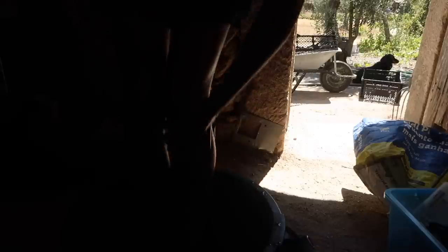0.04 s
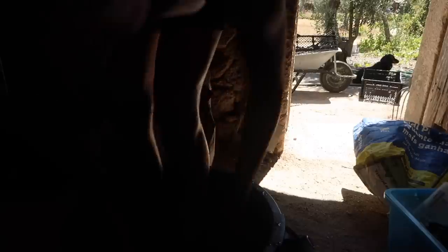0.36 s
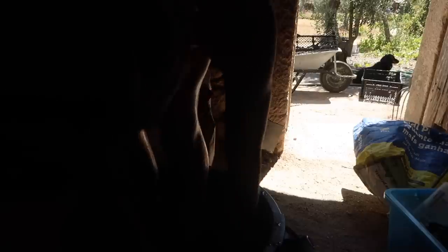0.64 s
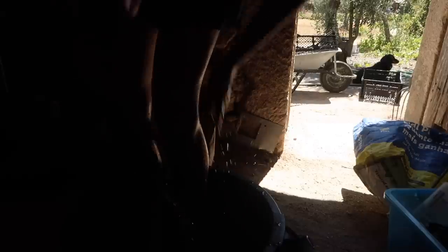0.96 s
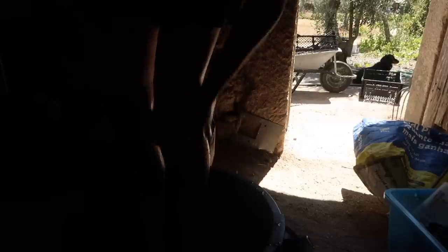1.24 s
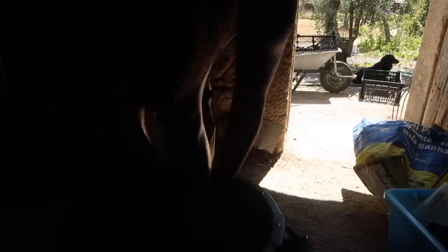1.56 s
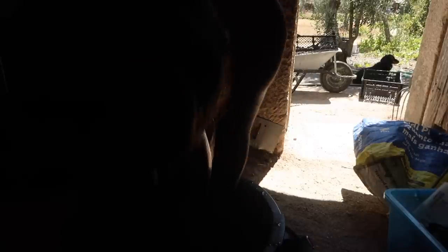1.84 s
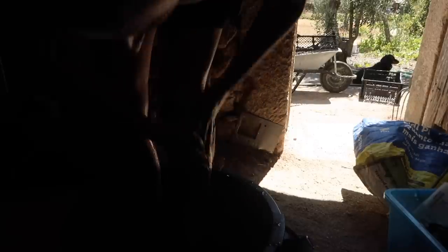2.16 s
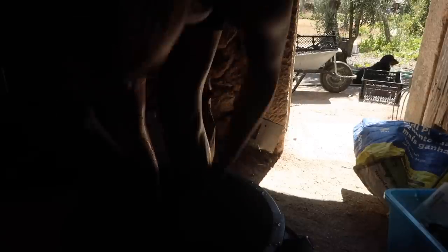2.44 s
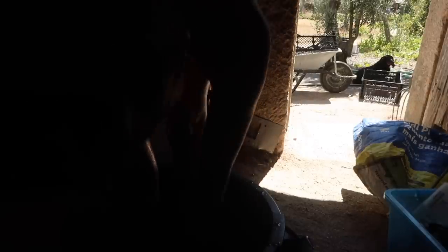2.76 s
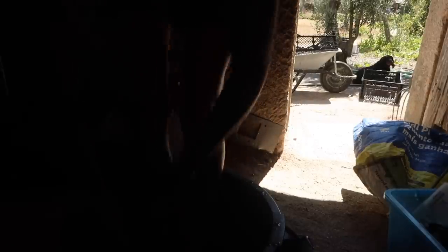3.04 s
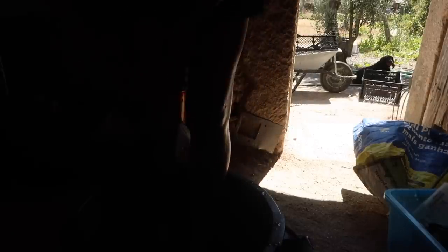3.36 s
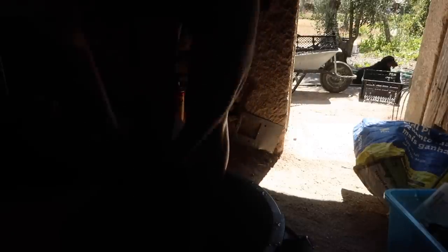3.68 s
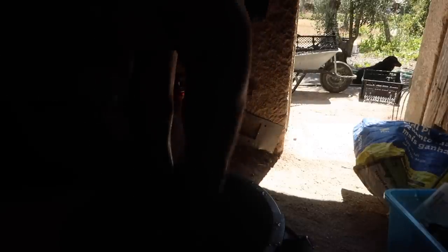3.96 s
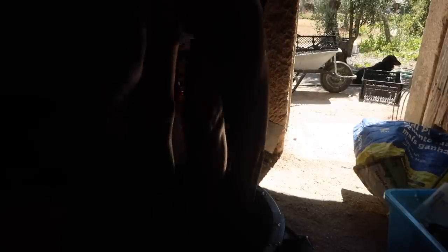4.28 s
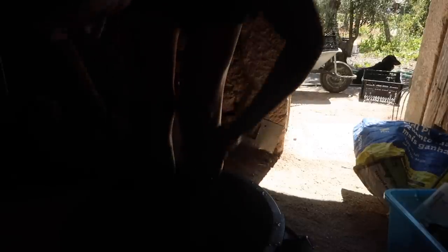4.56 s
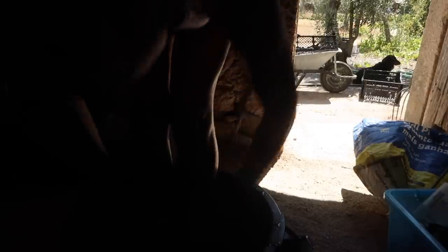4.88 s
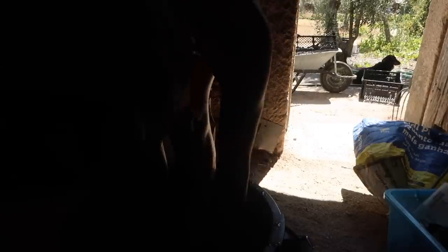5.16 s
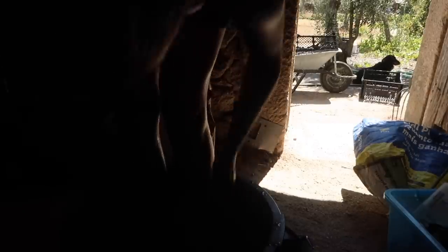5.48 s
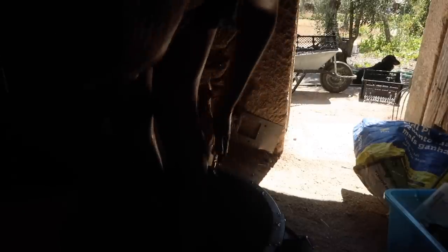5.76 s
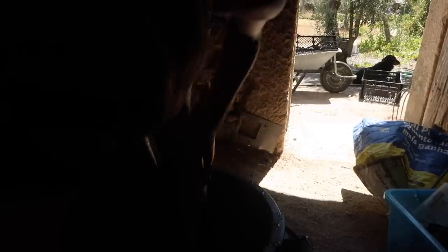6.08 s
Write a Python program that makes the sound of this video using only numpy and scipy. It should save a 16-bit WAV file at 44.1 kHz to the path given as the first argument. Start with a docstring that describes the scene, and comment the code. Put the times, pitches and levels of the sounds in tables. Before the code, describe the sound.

Bare feet tread crushed grapes in a plastic tub, heard close in a quiet barn. Small wet splats and pops open the sound. The first stroke squelches and gurgles from about 0.6 to 1.4 seconds, with popping bubbles and fine spray. A second follows from 1.7 to 2 seconds with light sole slaps, then a clear drip at 2.1. The third gulps and squelches from 2.6 to 3 seconds, followed by a lull with a few soft splats. The fourth, from 4 to 4.6 seconds, is the sharpest, with wet slaps and loud pops. Juice drips, and a heel thumps the tub dully near 5 seconds. The fifth stroke gurgles deeply from 5.1 to 5.5 seconds. Scattered drips, pops and splats continue until about 6.3 seconds. Everything carries a short hollow echo from the tub and a slight one from the barn, over faint still air.

```python
"""Inside a barn, bare feet tread crushed grapes in a plastic tub: five slow strokes.
Each stroke churns the must into clouds of bubbles and spray. Large air pockets ring and pop,
the hollow under the foot gulps, soles slap, wet skins splat and juice drips back.
Once a heel thumps the tub. The tub wall and the barn echo over faint still air."""
import sys
import numpy as np
from scipy import signal
from scipy.fft import rfft, irfft, next_fast_len
from scipy.io import wavfile
from scipy.ndimage import uniform_filter1d, map_coordinates

SR = 44100
rng = np.random.default_rng(int(sys.argv[2]) if len(sys.argv) > 2 else 0)


def write(x):
    x = np.atleast_2d(x).T
    wavfile.write(sys.argv[1], SR, np.round(np.clip(x, -1, 1) * 32767).astype(np.int16))

N = 278705


def amp(db):
    """Decibels to gain."""
    return 10 ** (np.asarray(db) / 20)


def unit(x):
    """Scale to rms 1."""
    return x / np.sqrt(np.mean(x ** 2) + 1e-20)


def along(points, hz):
    """Interpolate (freq_hz, value) points on a log axis."""
    freqs_hz, values = np.transpose(points)
    return np.interp(np.log(hz + 1), np.log(freqs_hz), values)


def filtered(x, response):
    """Apply a zero-phase gain, response(hz)."""
    size = next_fast_len(N + SR // 2)
    return irfft(rfft(x, size) * response(np.fft.rfftfreq(size, 1 / SR)), size)[..., :N]


def coloured(x, spectrum):
    """Shape by (freq_hz, gain_db) points; rms 1."""
    return unit(filtered(x, lambda hz: amp(along(spectrum, hz))))


def add(track, start_s, sound):
    """Mix a sound into a track."""
    start = int(np.clip(start_s * SR, 0, len(track) - 1))
    track[start:start + len(sound)] += sound[:len(track) - start]


def jitter(t, per_s):
    """Smooth random motion, rms about 1."""
    knots = t * per_s
    return map_coordinates(rng.standard_normal(int(knots[-1]) + 2), [knots])


PITCH_WOBBLE, LEVEL_WOBBLE = 0.032, 0.22
def wobble(t, depth):
    """Pulp pressure on a bubble wall: a factor wavering about 1."""
    return 1 + depth * jitter(t, per_s=260)


def bubble(t, hz, life_s, rise, swell):
    """A bubble rings up, dies, and climbs in pitch as it nears the surface."""
    age = t / life_s
    pitch_hz = hz * (1 + rise * np.minimum(age, 2) ** 2)
    envelope = (1 - np.exp(-age / swell)) ** 2 * np.exp(-age ** 1.3)
    return envelope * np.sin(2 * np.pi * np.cumsum(pitch_hz, axis=-1) / SR)


def froth(spectrum, band_hz, per_s, cycles, rush, spread_db):
    """Small damped bubbles of random size over rushing juice; rms 1."""
    low_hz, high_hz = band_hz
    when, size, strength, damping = rng.random((int(per_s * N / SR), 4)).T[..., None]
    hz = low_hz * (high_hz / low_hz) ** size
    life_s = cycles * (0.5 + damping) / hz
    samples = np.arange(int(2 * cycles / low_hz * SR))
    rings = bubble(np.float32(samples / SR), np.float32(hz), np.float32(life_s), rise=0, swell=0.24)
    rings = rings * np.sqrt(hz) * amp(spread_db * np.minimum(-np.log(1 - strength), 3))
    positions = (when * N).astype(int) + samples
    cloud = np.bincount(positions.ravel(), rings.ravel(), N)[:N]
    return unit(coloured(cloud, spectrum) + rush * coloured(rng.standard_normal(N), spectrum))


# Barn air: freq_hz, gain_db
AIR_SPECTRUM = [(18, -57.5), (30, -19.5), (139, -11.5), (346, -5), (524, -13.5), (629, -11.5), (1340, -19),
                (2920, -19.5), (3320, -20.5), (3680, -25.5), (5730, -29), (15000, -53)]
def still_air():
    """Faint steady noise, mid and side."""
    return amp([[-65.8], [-74.5]]) * coloured(rng.standard_normal((2, N)), AIR_SPECTRUM)


# Side relative to mid: freq_hz, gain_db
SIDE_SPECTRUM = [(125, -29), (400, -23), (1000, -25.5), (2500, -24), (3100, -19), (3900, -7.5),
                 (5500, -4.5), (7500, 1.5), (9500, 4), (14000, 2.5)]
def scattered(mid):
    """Sound from many directions: a phase-shuffled side signal, mostly treble."""
    bins = signal.stft(mid, nperseg=256)[2]
    shuffled = signal.istft(bins * np.exp(2j * np.pi * rng.random(bins.shape)), nperseg=256)[1][:N]
    return filtered(unit(shuffled) * np.std(mid), lambda hz: amp(along(SIDE_SPECTRUM, hz)))


# Decay of the barn: freq_hz, t60_s
BARN_DECAY = [(100, 0.25), (500, 0.14), (2000, 0.36), (5000, 0.056), (12000, 0.1)]
# Decay of the air in the tub: freq_hz, t60_s
TUB_AIR_DECAY = [(250, 0.086), (650, 0.13), (1100, 0.096), (2500, 0.16), (8000, 0.2)]
def echoes(x, decay, gap_s):
    """Diffuse tails, crossfaded so the echo changes as the feet move."""
    hop = SR // 3
    out, padded = np.zeros(N + hop), np.pad(x, (hop, 2 * hop))
    crossfade = signal.windows.cosine(2 * hop)
    for start in range(0, N + hop, hop):
        hz, t, bins = signal.stft(rng.standard_normal(SR // 2), SR, nperseg=256)
        tail = signal.istft(bins * amp(-60 * t / along(decay, hz)[:, None]), SR, nperseg=256)[1]
        piece = padded[start:start + 2 * hop] * crossfade
        add(out, start / SR + gap_s, signal.fftconvolve(piece, tail / np.linalg.norm(tail)))
    return out[hop:]


def seepage(churn, settle_s=0.24):
    """Churned must keeps fizzing, fainter as it settles."""
    leak = 1 / (settle_s * SR)
    wetness = signal.lfilter([leak], [1, leak - 1], churn)
    spectrum = [(500, 4.5), (1200, -10), (2400, -2), (4000, -8.5), (7000, -18.5), (11000, -21),
                (15000, -29.5)]
    fizz = froth(spectrum, band_hz=(800, 11000), per_s=400, cycles=10, rush=0.45, spread_db=2.5)
    return (amp(-29.5) * wetness + amp(-70)) * fizz


# Falling drops: start_s, pitch_hz, level_db, climb_hz_per_s
DRIPS = [(1.54, 2204, -42.5, 19800), (1.624, 2110, -39.5, 22200), (2.109, 1528, -21, 15400),
         (3.391, 1025, -42.5, 2500), (4.662, 2290, -33, 2000), (4.773, 1610, -42.5, 9240),
         (4.865, 1200, -38.5, 11940), (4.884, 1570, -39, 9160), (4.917, 1770, -36.5, 5880),
         (5.083, 1140, -32.5, 13350), (5.581, 1263, -29.5, 2980), (5.747, 1240, -27, 17600)]
def drips(attack_s=0.00092, life_s=0.011):
    """Each drop traps a bubble that rings and glides upward."""
    out, t = np.zeros(N), np.arange(SR // 15) / SR
    envelope = (1 - np.exp(-t / attack_s)) ** 2 * np.exp(-t / life_s)
    for start_s, hz, db, climb_hz_per_s in DRIPS:
        gain = amp(db + 3) * envelope * wobble(t, LEVEL_WOBBLE)
        pitch_hz = (hz + climb_hz_per_s * t) * wobble(t, PITCH_WOBBLE)
        add(out, start_s, gain * np.sin(2 * np.pi * np.cumsum(pitch_hz) / SR))
    return out


# Modes of the loaded tub: pitch_hz, level_db, t60_s
TUB_MODES = [(157, 7.5, 0.046), (221, -10, 0.11), (347, -5, 0.06), (407, -7, 0.06), (505, -6, 0.07),
             (815, -16.5, 0.081)]
def heel_thump(start_s=4.961, attack_s=0.0027, thud_t60_s=0.11):
    """The heel lands, then the full weight; both ring the juice-damped tub."""
    out, t = np.zeros(N), np.arange(SR // 3) / SR
    ring = sum(amp(db - 60 * t / t60_s) * np.sin(2 * np.pi * hz * t) for hz, db, t60_s in TUB_MODES)
    onset = 1 - np.exp(-t / attack_s)
    spectrum = [(70, -33.5), (150, 11), (600, -5), (950, -9), (1600, -60.5)]
    lowest_hz = TUB_MODES[0][0]
    for delay_s, db in [(0, -21.5), (2 / lowest_hz, -19.5)]:
        thud = coloured(rng.standard_normal(N), spectrum)[:len(t)] * amp(-60 * t / thud_t60_s)
        add(out, start_s + delay_s, amp(db) * onset * (ring + 0.65 * thud))
    return out


# Soles on juice: start_s, level_db
SLAPS = [(0.621, -24.5), (1.756, -27), (1.909, -27.5), (4.277, -17.5), (4.450, -23)]
def slaps(life_s=0.0031):
    """A sole hits the surface with one short, broad crack."""
    out, t = np.zeros(N), np.arange(SR // 50) / SR
    for start_s, db in SLAPS:
        add(out, start_s, amp(db + 8) * np.exp(-t / life_s) * rng.standard_normal(len(t)))
    spectrum = [(120, -53.5), (500, -21), (3000, 9.5), (6000, -7.5), (10000, -20.5), (15000, -33.5)]
    return filtered(out, lambda hz: amp(along(spectrum, hz)))


# Hollows under a sinking foot: deepest_s, lowest_hz, level_db
GULPS = [(.708, 600, -35), (1.82, 369.6, -34), (2.75, 309.5, -31), (4.175, 850, -34), (5.228, 285, -26)]
def gulps(fall_oct_per_s=22, rise_oct_per_s=14, swell_s=0.014, fade_s=0.073, bandwidth_ratio=0.3):
    """A hollow rings roughly; pitch sinks as it opens, climbs as the must closes in."""
    out, t = np.zeros(N), np.arange(SR // 3) / SR
    lead_s = t[-1] / 3
    opening_s, closing_s = np.maximum(lead_s - t, 0), np.maximum(t - lead_s, 0)
    envelope = np.exp(-(opening_s / swell_s) ** 2 - (closing_s / fade_s) ** 2)
    glide = 2 ** (fall_oct_per_s * opening_s + rise_oct_per_s * closing_s)
    for deepest_s, hz, db in GULPS:
        phase = 2 * np.pi * np.cumsum(hz * glide) / SR
        ring = sum(jitter(t, bandwidth_ratio * hz) * wave(phase) for wave in (np.sin, np.cos))
        add(out, deepest_s - lead_s, amp(db) * envelope * ring)
    return out


def lesser_pockets(churn, per_s=32, low_hz=867, high_hz=2547, life_s=0.004):
    """Notes of small pockets freed by churning and choked by the pulp."""
    for slot, (when, size) in enumerate(rng.random((int(per_s * N / SR), 2))):
        start_s = (slot + when) / per_s
        churn_db = 20 * np.log10(churn[min(int(start_s * SR), N - 1)] + 1e-9)
        yield start_s, low_hz * (high_hz / low_hz) ** size, churn_db + 4, life_s


# Bursting air pockets: start_s, pitch_hz, level_db
POPS = [(.025, 2296, -15.5), (.106, 6450, -37), (.184, 573, -27), (.253, 2375, -33), (0.314, 3460, -36),
        (0.762, 1238, -15), (0.862, 2870, -23.5), (.906, 2360, -21.5), (0.961, 2385, -16.5),
        (1.315, 3140, -18.5), (1.317, 2390, -21.5), (1.315, 1136, -27), (1.493, 3200, -29.5),
        (1.553, 2510, -34), (1.755, 2360, -13.5), (1.842, 1220, -15.5), (1.907, 1714, -14.5),
        (2.214, 2770, -21), (2.221, 2460, -27), (2.907, 1970, -16.5), (2.938, 1890, -21),
        (3.272, 563, -46.5), (3.416, 2740, -34), (3.631, 3290, -27), (4.001, 2110, -35),
        (4.009, 3990, -23.5), (4.023, 3270, -9.5), (4.03, 2170, -15), (4.084, 2060, -18), (4.1, 1964, -13),
        (4.119, 1575, -12.5), (4.269, 2430, -11), (4.275, 2950, -6), (4.319, 1730, -15.5), (4.45, 1196, -8),
        (4.495, 2040, -13), (4.509, 2140, -16.5), (4.538, 1710, -21.5), (4.598, 1470, -21),
        (4.907, 1127, -26), (5.109, 2756, -16.5), (5.251, 2615, -14), (5.482, 3260, -16.5),
        (6.126, 3020, -28), (6.257, 2940, -21.5)]
def bursting_pockets(cycles=3.15, resnap_s=0.0022):
    """Notes of pockets that snap open; the skin snaps again, softer."""
    for (start_s, hz, db), (wait, step) in zip(POPS, rng.random((len(POPS), 2))):
        yield start_s, hz, db, cycles / hz
        yield start_s + resnap_s * (0.5 + wait), hz * (0.75 + 0.5 * step), db - 5, cycles / hz


# Large submerged air pockets, plus one thin high squirt at 1.36 s: start_s, pitch_hz, level_db
SUBMERGED = [(0.024, 1653, -29), (0.076, 1264, -32), (0.187, 641, -32.5), (0.342, 1870, -21.5),
             (0.363, 1485, -28.5), (.388, 762, -30.5), (0.5, 1470, -30.5), (0.508, 620, -38.5),
             (0.579, 1754, -30), (.648, 1883, -19), (0.679, 240, -36), (.685, 1214, -18),
             (.708, 608, -18.5), (0.746, 890, -25.5), (0.857, 2330, -23.5), (.875, 710, -26),
             (0.965, 1115, -23.5), (1.006, 650, -24.5), (1.012, 1960, -19.5), (1.046, 1503, -26),
             (1.061, 1614, -18), (1.118, 830, -23.5), (1.2, 1124, -22), (1.241, 2230, -24),
             (1.36, 7400, -29.5), (1.437, 165, -38.5), (1.443, 2264, -36.5), (1.697, 1087, -33),
             (1.795, 561, -31.5), (1.813, 514, -30), (1.824, 346, -29), (1.886, 730, -19.5),
             (1.89, 1170, -17.5), (2.117, 3330, -27), (2.167, 2095, -29.5), (2.206, 2400, -33),
             (2.27, 3950, -38), (2.597, 2130, -38.5), (2.743, 312, -22.5), (2.754, 680, -30.5),
             (2.769, 358, -30.5), (2.81, 1700, -22), (2.879, 1270, -24), (2.908, 1221, -22.5),
             (2.917, 578, -26.5), (3.001, 2582, -18.5), (3.01, 1288, -28), (3.271, 1334, -39),
             (3.727, 1606, -41.5), (4.035, 570, -28.5), (4.041, 1818, -15), (4.098, 1953, -16.5),
             (4.114, 1616, -16.5), (4.224, 1178, -22), (4.25, 2172, -22.5), (4.309, 1600, -10),
             (4.32, 663, -27), (4.425, 955, -26.5), (4.536, 1736, -28), (4.619, 1305, -30),
             (4.971, 3400, -45.5), (5.078, 2700, -35.5), (5.122, 1388, -25.5), (5.165, 489, -26),
             (5.171, 2743, -25.5), (5.19, 2160, -26.5), (5.216, 2140, -23.5), (5.218, 280, -24),
             (5.239, 426, -27), (5.261, 1136, -26), (5.276, 420, -21), (5.295, 910, -20),
             (5.341, 1478, -12.5), (5.446, 2212, -22), (5.486, 946, -28.5), (6.062, 2178, -28.5),
             (6.112, 1610, -36), (6.115, 2800, -35)]
def submerged_pockets(shed_wait_s=0.012, shed_step=0.12):
    """Notes of pockets that ring, tear and shed a smaller, shorter-lived one."""
    life_s = lambda hz: 0.00821 * (hz / 1000) ** -0.3
    for (start_s, hz, db), (wait, step) in zip(SUBMERGED, 0.5 + rng.random((len(SUBMERGED), 2))):
        yield start_s, hz, db, life_s(hz)
        shed_hz = hz * (1 + shed_step * step)
        yield start_s + shed_wait_s * wait, shed_hz, db - 13.5, life_s(shed_hz)


def air_pockets(churn, shallow_rise=0.066):
    """Each pocket rings one note; some climb in pitch, others hold it."""
    out, t = np.zeros(N), np.arange(SR // 15) / SR
    for start_s, hz, db, life_s in [*bursting_pockets(), *submerged_pockets(), *lesser_pockets(churn)]:
        pitch_hz = hz * wobble(t, PITCH_WOBBLE)
        ring = bubble(t, pitch_hz, life_s, rise=shallow_rise * rng.random(), swell=0.21)
        add(out, start_s, amp(db + 5.5) * ring * wobble(t, LEVEL_WOBBLE))
    return out


def stirring(lead_s=0.0024, attack_s=0.0017, life_s=0.0095, split_hz=700):
    """Large pockets stir the pulp: envelopes of gurgle (low pockets) and squelch (high ones)."""
    drive, t = np.zeros((2, N)), np.arange(SR // 2) / SR
    envelope = (1 - np.exp(-t / attack_s)) * np.exp(-t / life_s)
    for start_s, hz, db in SUBMERGED + POPS:
        add(drive[int(hz > split_hz)], start_s - lead_s, amp(db - 20) * envelope)
    return drive


# Wet skins and juice landing: start_s, gurgle_db, squelch_db, smack_db, life_ms
SPLATS = [(0.0, -45, -35, -47.5, 30), (0.146, -44, -46, -58, 43), (.245, -41.5, -60.5, -67, 22),
          (0.335, -67.5, -36, -48.5, 58), (0.489, -54.5, -46, -69, 270), (1.352, -75, -50, -30, 22.6),
          (1.43, -68, -52.5, -45, 16), (1.486, -64, -42.5, -42.5, 10), (1.55, -42, -45.5, -49, 18.6),
          (1.69, -72.5, -48.5, -51.5, 63), (2.108, -55, -44.5, -48, 44), (2.168, -69, -56.5, -44.5, 15),
          (2.214, -64, -63, -77, 24), (2.264, -72, -64, -50.5, 12), (3.105, -46, -47, -58.5, 22),
          (3.267, -37.5, -44, -78, 15), (3.331, -78, -69, -54, 33), (3.674, -41, -38.5, -39.5, 25.3),
          (4.474, -43, -39.5, -26.5, 15), (4.904, -38, -68, -52.5, 24.5), (5.697, -73, -42.5, -64, 8.6),
          (6.059, -74, -47.5, -40.5, 22), (6.31, -57, -34, -39, 43)]
def splats(attack_s=0.0023):
    """Each landing jumps and dies away: envelopes of gurgle, squelch and smack."""
    drive, t = np.zeros((3, N)), np.arange(SR // 2) / SR
    for start_s, *levels_db, life_ms in SPLATS:
        envelope = (1 - np.exp(-t / attack_s)) * np.exp(-t * 1000 / life_ms)
        for track, db in zip(drive, levels_db):
            add(track, start_s, amp(db) * envelope)
    return drive


# Foot pushes, several a stroke: start_s, hold_s, gurgle_db, squelch_db, spray_db
PUSHES = [(0.0, .55, -68, -62, -58), (0.598, 0.033, -32, -36, -42.5), (0.652, 0.14, -40, -27.5, -43),
          (0.849, 0.088, -49, -34, -42), (0.971, 0.2, -34.5, -34.5, -42.5), (1.201, 0.15, -76, -38.5, -44),
          (1.402, .1, -66, -57.5, -59.5), (1.73, 0.053, -38, -29.5, -41.5), (1.789, 0.16, -26, -31.5, -46),
          (1.938, 0.097, -42.5, -38, -54), (2.644, 0.026, -83, -39, -47), (2.664, 0.088, -40, -32, -49),
          (2.766, 0.15, -33.5, -34, -51.5), (2.891, 0.086, -40, -29, -44.5), (4, 0.025, -74, -44.5, -43),
          (4.019, 0.12, -39, -25.5, -40), (4.161, 0.11, -36.5, -35, -39.5),
          (4.255, 0.16, -59.5, -28.5, -47), (4.393, 0.045, -36, -39, -41),
          (4.439, 0.099, -40.5, -27, -36.5), (5.083, 0.051, -75.5, -39, -40.5),
          (5.116, 0.068, -40, -31, -46), (5.209, 0.12, -28.5, -27, -39), (5.354, 0.058, -39, -35, -50),
          (5.438, 0.074, -43, -35, -48.5)]
# Response of gurgle, squelch and spray: attack_s, sag_db_per_s, release_s
PUSH_RESPONSE = [(0.022, 22, 0.027), (.012, 0, 0.034), (0.012, 8, .036)]
def pushes():
    """Each push swells, holds and drains: envelopes of gurgle, squelch and spray."""
    drive = np.zeros((3, N))
    for start_s, hold_s, *levels_db in PUSHES:
        start = int(start_s * SR)
        t = np.arange(min(SR, N - start)) / SR
        span = slice(start, start + len(t))
        for track, db, (attack_s, sag_db_per_s, release_s) in zip(drive, levels_db, PUSH_RESPONSE):
            swell = amp(db - sag_db_per_s * t) * (1 - np.exp(-t / attack_s))
            drain = np.exp(-np.maximum(t - hold_s, 0) / release_s)
            track[span] = np.hypot(track[span], swell * drain)
    return drive


def surges(per_s, life_s, depth):
    """Random surges: the flow jumps and sinks back, making the spray crackle; rms 1."""
    jumps = (rng.random(N) < per_s / SR) * rng.uniform(0.13, 1, N)
    surge = signal.lfilter([1], [1, -np.exp(-1 / (life_s * SR))], jumps)
    return unit(1 + depth * uniform_filter1d(surge, size=66))


# Spectra of deep juice, pulp, fine spray and peeling wet skin: freq_hz, gain_db
GURGLE = [(50, -49.5), (150, -7), (300, -5.5), (600, 11), (850, 2.5), (1300, -8.5), (3000, -50.5)]
SQUELCH = [(300, -38), (700, -9), (1100, -2.5), (1800, 4.5), (3000, 0), (4200, -11), (7000, -24),
           (15000, -53)]
SPRAY = [(1500, -28.5), (3500, -1), (5000, 2), (7000, -9.5), (10000, -15.5), (13000, -20.5), (15500, -47)]
SMACK = [(1500, -10.5), (3000, 3.5), (4500, 3.5), (6500, 1), (9000, -7), (11000, -11.5), (15000, -32.5)]
def treading():
    """Pushes and splats drive four bubble clouds; seepage and lesser pockets follow the churn."""
    push_gurgle, push_squelch, push_spray = pushes()
    splat_gurgle, splat_squelch, splat_smack = splats()
    deep, churn = np.hypot([push_gurgle + splat_gurgle, push_squelch + splat_squelch], stirring())
    flutter = surges(per_s=76, life_s=0.0095, depth=0.62)
    crackle = surges(per_s=29, life_s=0.012, depth=2.4)
    gurgle = froth(GURGLE, band_hz=(236, 1116), per_s=440, cycles=3.6, rush=0.45, spread_db=3)
    squelch = froth(SQUELCH, band_hz=(738, 4250), per_s=1050, cycles=6.8, rush=0.38, spread_db=4.5)
    spray = froth(SPRAY, band_hz=(3200, 14000), per_s=1300, cycles=9, rush=0.4, spread_db=3.5)
    smack = froth(SMACK, band_hz=(2500, 11000), per_s=2000, cycles=3.5, rush=1, spread_db=2.5)
    gurgle *= amp(-4.5) * deep
    squelch *= amp(-2.25) * churn * flutter
    spray *= amp(-1) * push_spray * unit(flutter ** 0.27 * crackle)
    smack *= amp(-1) * splat_smack
    return gurgle + squelch + spray + smack + seepage(churn) + air_pockets(churn)


def scene():
    """The tub wall echoes first, the barn later; treble and still air spread wide."""
    must = treading() + gulps() + drips() + slaps() + heel_thump()
    tub = must + amp(-5) * echoes(must, TUB_AIR_DECAY, gap_s=0.004)
    barn = tub + amp(-21.5) * echoes(tub, BARN_DECAY, gap_s=0.014)
    mid, side = np.array([barn, scattered(barn)]) + still_air()
    return np.array([mid + side, mid - side])


LOW_CUT_HZ, TOP_HZ = 62, 15700
def record(dry):
    """Cut the deepest rumble and the highest treble."""
    high_passed = signal.sosfilt(signal.butter(2, LOW_CUT_HZ, "high", fs=SR, output="sos"), dry)
    return filtered(high_passed, lambda hz: hz < TOP_HZ)


dry = scene()
out = record(dry)
write(out)
```